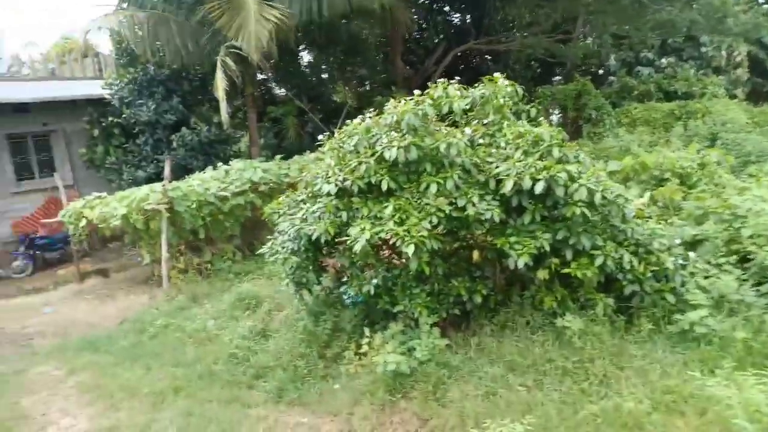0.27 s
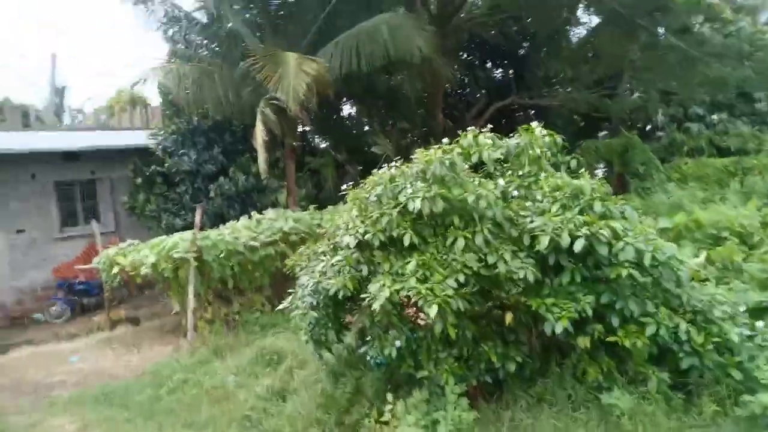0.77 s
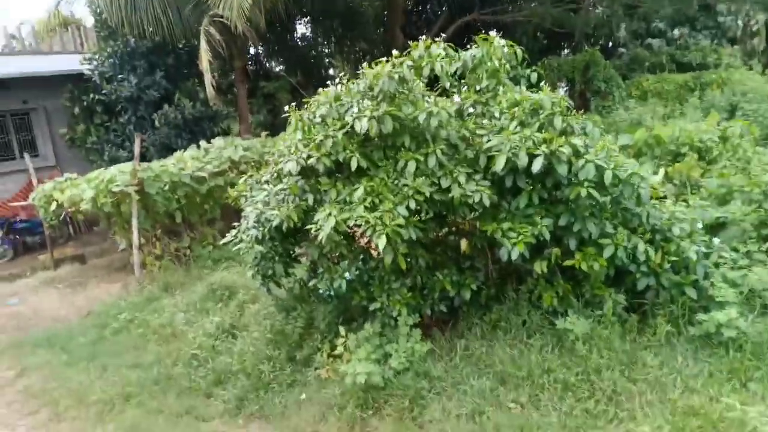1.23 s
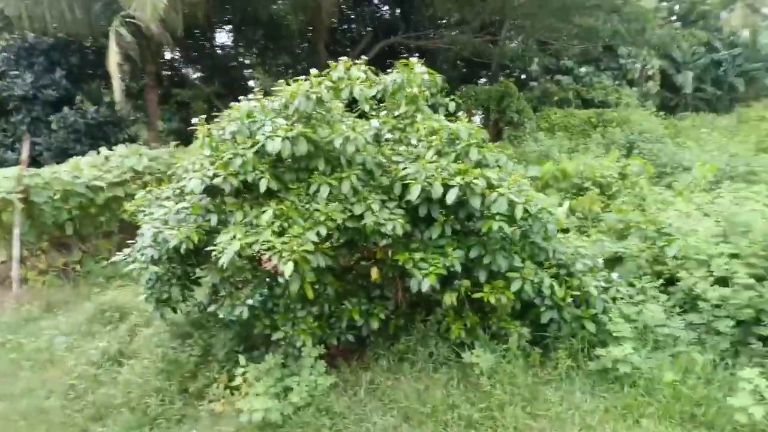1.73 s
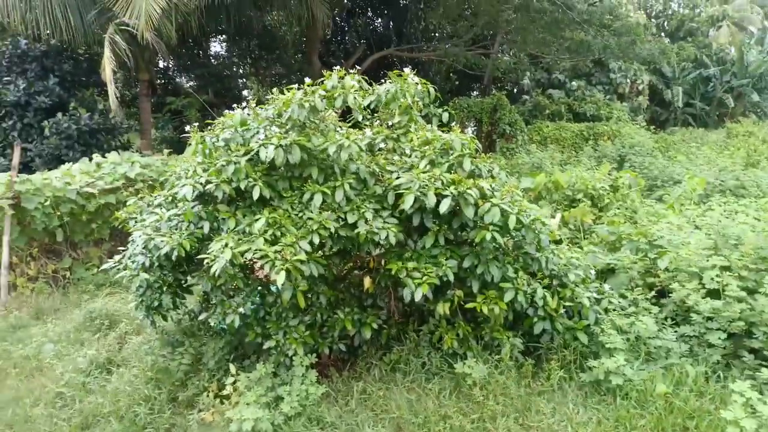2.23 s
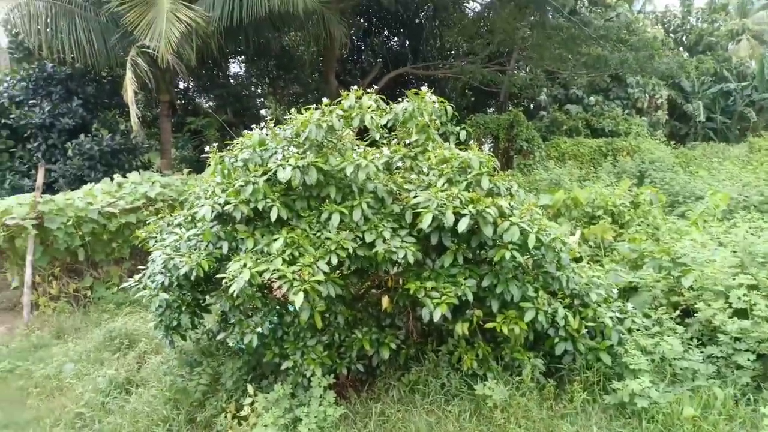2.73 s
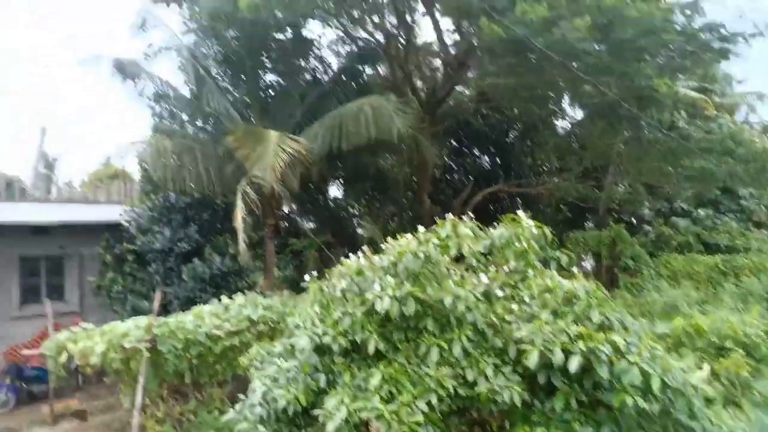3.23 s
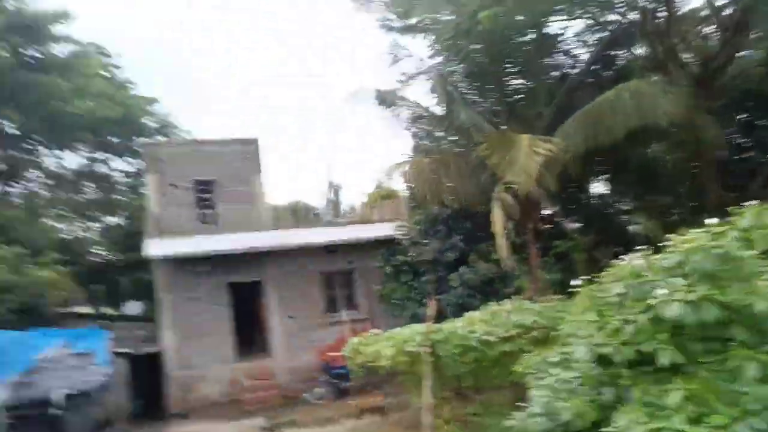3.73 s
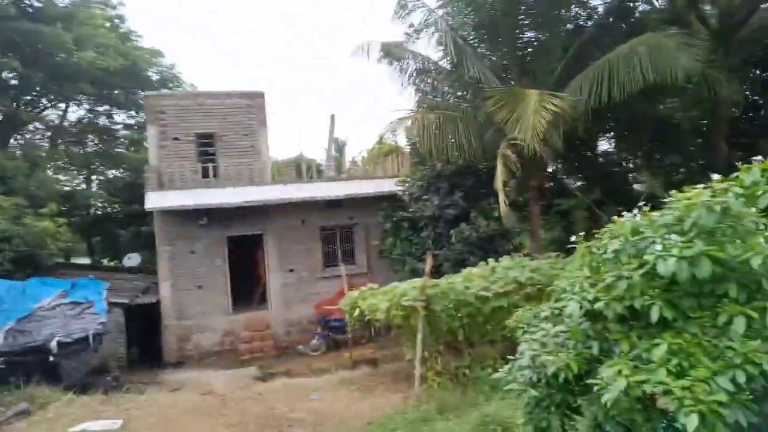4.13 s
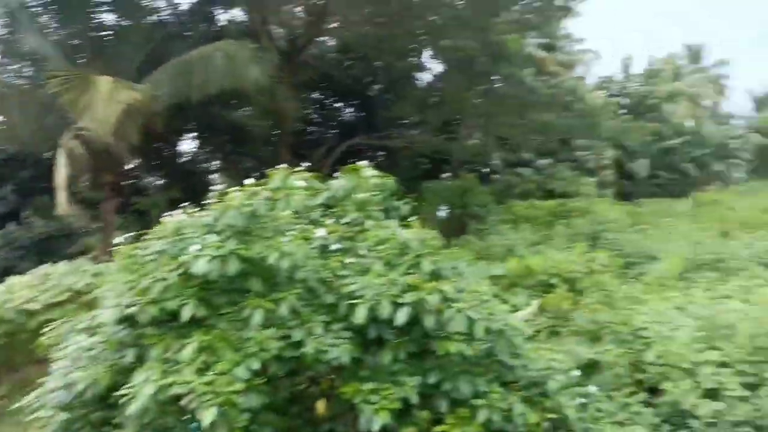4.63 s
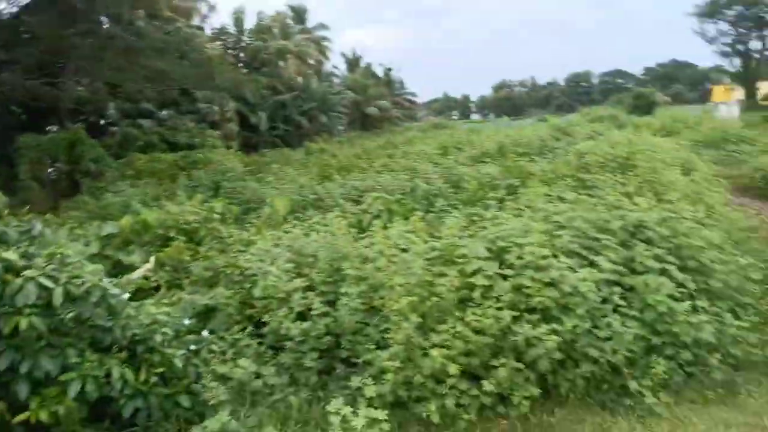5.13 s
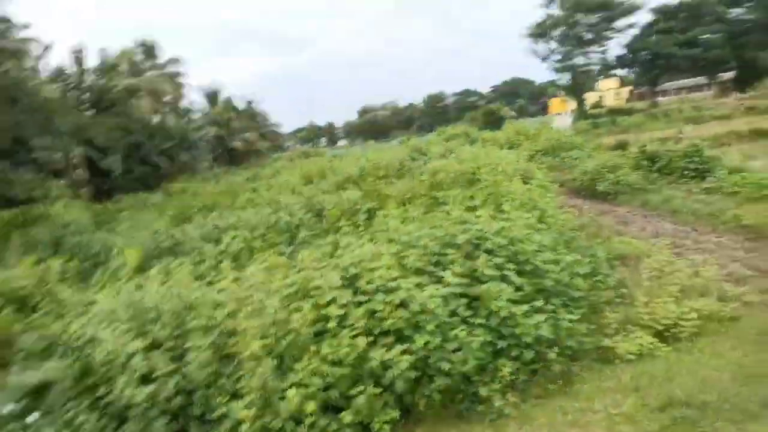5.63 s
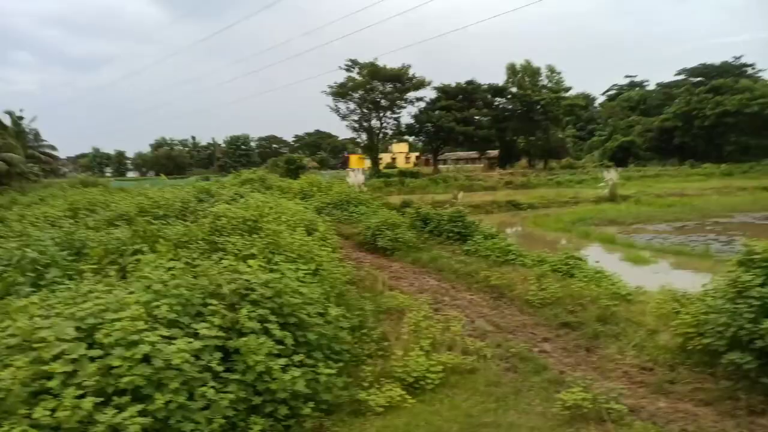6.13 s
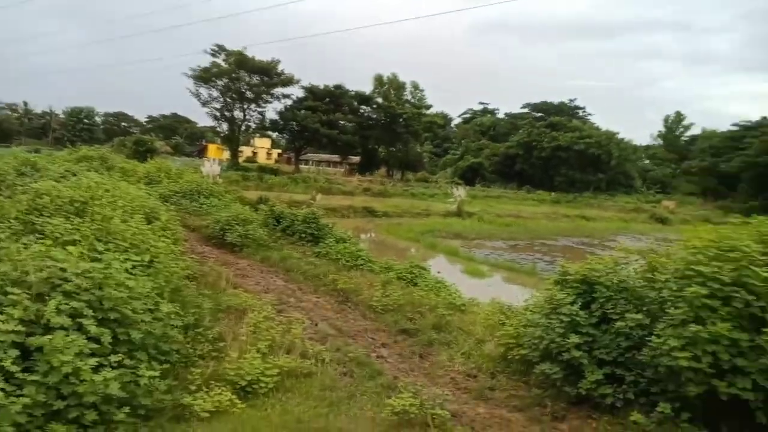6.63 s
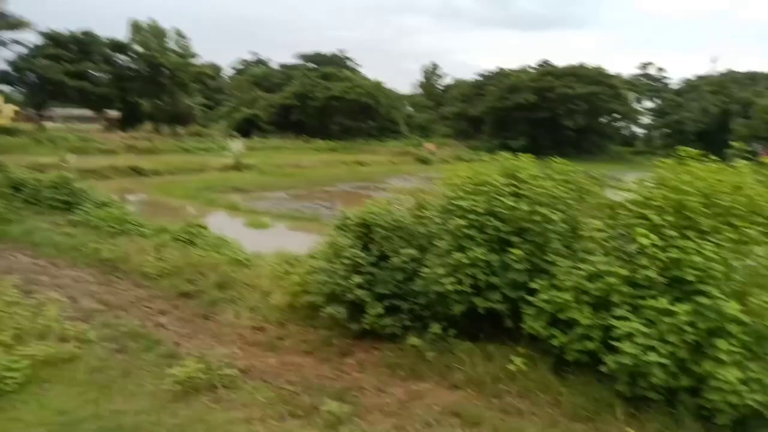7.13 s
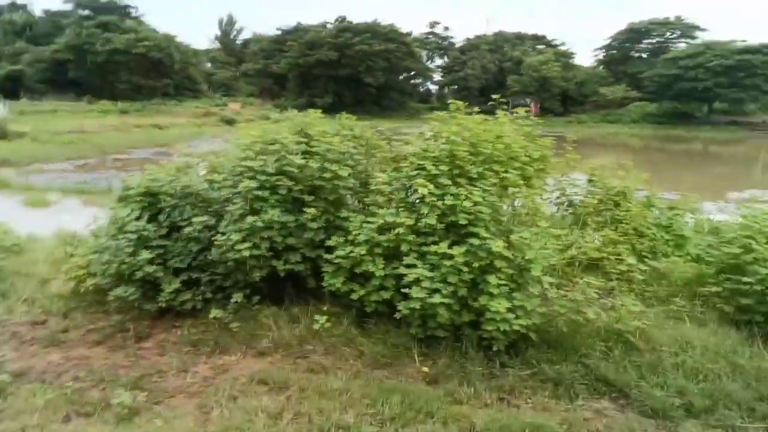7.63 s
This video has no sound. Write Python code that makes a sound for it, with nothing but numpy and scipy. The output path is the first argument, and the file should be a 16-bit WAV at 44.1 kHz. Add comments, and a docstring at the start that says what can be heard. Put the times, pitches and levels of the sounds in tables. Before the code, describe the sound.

One long, high cow call sinks and turns hoarse in a quiet farmyard, over chirping crickets, a small bird and soft microphone rubbing.

```python
"""A cow gives one long, high bellow across a farmyard. Its vocal folds ring on a tone that arches
and sinks, then they go slack and the voice breaks into a creak. Two bush crickets chirp with their
wings, first one on the left, later one on the right, over an insect chorus. A small bird twitters
and another animal calls far off. Fingers rub on the hand-held microphone, and light wind touches
its two openings (the ports)."""
import sys
import numpy as np
from scipy import signal
from scipy.fft import rfft, irfft, next_fast_len
from scipy.io import wavfile

SR = 44100
rng = np.random.default_rng(int(sys.argv[2]) if len(sys.argv) > 2 else 0)


def transcribe(signal):
    """Save signal, clipped to [-1, 1], as a 16-bit WAV file at the path in sys.argv[1]."""
    frames = np.atleast_2d(signal).T
    limited = np.clip(frames, -1, 1)
    pcm = np.round(limited * 32767).astype(np.int16)
    wavfile.write(sys.argv[1], SR, pcm)


N = 347949
TIME = np.arange(N) / SR


def from_db(db):
    """Turn decibels into a number to multiply by."""
    return 10 ** (np.asarray(db) / 20)


def unit_level(x):
    """Scale a sound so its average level (rms) is 1."""
    return x / np.sqrt(np.mean(x ** 2) + 1e-20)


def curves(rows):
    """Join a table's points over time: one curve for each column after the first."""
    times, *columns = np.transpose(rows)
    return [np.interp(TIME, times, column) for column in columns]


def during(rows):
    """1 from a table's first time to its last, with short fades outside."""
    start, stop = rows[0][0], rows[-1][0]
    return np.interp(TIME, [start - .02, start, stop, stop + .02], [0, 1, 1, 0])


def swell(peak_s, length_s):
    """A rounded rise and fall, 1 at the top."""
    return np.cos(np.pi * np.clip((TIME - peak_s) / length_s, -.5, .5))


def drift(rate_hz):
    """A smooth random wobble, about 1 in size."""
    r = np.exp(-40 * np.pi * rate_hz / SR)
    slow = signal.lfilter([1], [1, -2 * r, r * r], rng.standard_normal(N // 20 + 2002))[2000:]
    return np.interp(np.arange(N) / 20, np.arange(len(slow)), unit_level(slow))


def phase_of(hz):
    """The running angle of a vibration whose pitch changes."""
    return 2 * np.pi * np.cumsum(hz) / SR


def at_hz(points, hz):
    """Read between a table's frequencies, with octaves evenly spaced."""
    freqs, values = np.transpose(points)
    return np.interp(np.log(hz), np.log(freqs), values)


def noise(spectrum, likeness=((20, 0), (20000, 0))):
    """Stereo noise shaped by a spectrum; likeness 1 makes left and right the same, -1 opposite."""
    size = next_fast_len(N)
    hz = np.maximum(np.fft.rfftfreq(size, 1 / SR), 1)
    mid, side = rfft(rng.standard_normal((2, size)))
    alike = np.clip(at_hz(likeness, hz), -1, 1)
    edge_fade = 1 / (1 + (spectrum[0][0] / hz / 2) ** 2) / (1 + (hz / spectrum[-1][0] / 2) ** 2)
    both = np.sqrt(1 + alike) * mid + np.sqrt(1 - alike) * side * [[1], [-1]]
    return unit_level(irfft(both * edge_fade * from_db(at_hz(spectrum, hz)), size)[:, :N])


def panned(left_db):
    """Left and right gains that make the left side louder by left_db."""
    gains = from_db(np.array([[1], [-1]]) * left_db / 2)
    return gains / np.sqrt(np.mean(gains ** 2, axis=0))


def from_left(x, lag_ms):
    """The sound reaches the right port a little later."""
    return np.array([x, np.interp(TIME - lag_ms / 1000, TIME, x)])


def yard_echo(x, fade_s):
    """Walls and leaves scatter a spray of echoes that falls 60 dB in fade_s."""
    t = np.arange(SR) / SR
    spray = rng.standard_normal((2, SR)) * from_db(-60 * t / fade_s) * np.clip(t / .015, 0, 1)
    spray /= np.sqrt(np.sum(spray ** 2, axis=1, keepdims=True))
    return signal.fftconvolve(x[None], spray, axes=1)[:, :N]


# Tone colour of the swirling air and of the open-air hush: freq_hz, relative_db
EDDY_SPECTRUM = [(20, 2), (45, -0.5), (90, 2), (140, -8.5), (250, -25), (500, -42), (1000, -42)]
HUSH_SPECTRUM = [(18, -35), (30, -7), (59, -5), (252, -15.5), (311, -16), (341, -17), (431, -18),
                 (1180, -24), (1880, -28.5), (2490, -35), (3450, -40), (6190, -45), (8000, -48),
                 (10400, -84), (17600, -120)]
# How alike the hush is on both sides: freq_hz, likeness
HUSH_LIKENESS = [(30, 0.52), (100, 0.93), (250, 0.9), (500, 0.42), (1000, -0.39), (2000, 0.055),
                 (15000, -0.5)]
# Gusts: peak_s, length_s, eddy_db, left_db, hush_db
GUSTS = [(.3, 2.5, -63.5, -2.5, -56), (1.1, 1.9, -56, 0, -60.5), (2.272, 0.43, -51, -35, -69),
         (3.049, 0.65, -60.5, -13, -89), (3.606, 0.74, -71.5, -9, -67), (6.18, 0.75, -60.5, -6, -67),
         (6.752, 0.48, -61, -3, -68), (7.432, 0.53, -51, 3, -59)]
# Soft thumps of air on the right port: time_s, pitch_hz, peak_db
THUMPS = [(0.369, 84, -34.5), (1.785, 59, -36.5), (1.876, 66.4, -30), (2.282, 62.6, -46),
          (2.372, 47, -35.5), (6.252, 56.7, -42), (6.331, 45, -45.5)]
CALM_EDDY_DB, CALM_HUSH_DB = -68.5, -67

def breeze():
    """Air hushes and swirls at the ports, louder in each gust, with a few soft thumps."""
    eddy_power, hush_power = from_db(CALM_EDDY_DB) ** 2, from_db(CALM_HUSH_DB) ** 2
    for peak_s, length_s, eddy_db, left_db, hush_db in GUSTS:
        gust = swell(peak_s, length_s)
        eddy_power = eddy_power + (from_db(eddy_db) * gust * panned(left_db)) ** 2
        hush_power = hush_power + (from_db(hush_db) * gust) ** 2
    eddies = np.sqrt(eddy_power) * noise(EDDY_SPECTRUM, likeness=[(30, .23), (150, 1)])
    hush = np.sqrt(hush_power) * noise(HUSH_SPECTRUM, HUSH_LIKENESS)
    thumps = np.zeros(N)
    for time_s, hz, db in THUMPS:
        cycles = hz * (TIME - time_s)
        thumps += from_db(db) * np.cos(2 * np.pi * cycles) * np.exp(-np.minimum((1.54 * cycles) ** 2, 50))
    return eddies + hush + thumps * np.array([[from_db(-27)], [1]])


# Tone colour of sliding skin and of the ringing case: freq_hz, relative_db
SKIN_SPECTRUM = [(900, -14.5), (2000, 2.5), (3000, -1), (5000, -1), (6500, -7.5), (8000, -1), (9000, 4),
                 (10500, -8), (13000, -3), (15500, -20)]
CASE_SPECTRUM = [(400, -12), (800, -17.5), (1200, 1), (1550, -7.5), (2100, -19.5), (3000, -24),
                 (5000, -32.5)]
# Finger strokes: peak_s, rise_s, fall_s, hiss_db, ring_db
FINGER_STROKES = [(.55, 0.21, 0.15, -64, -52.5), (.74, 0.095, 0.14, -65, -57.5),
                  (1.165, .09, 0.099, -54.5, -50), (1.46, 0.31, 0.17, -69.5, -63),
                  (1.715, .13, 0.041, -57, -52), (1.901, .04, 0.054, -74, -78),
                  (3.05, 0.066, 0.31, -74.5, -72.5), (3.47, 0.12, 0.18, -71, -67),
                  (4.33, 0.26, 0.39, -80, -66.5), (4.402, .13, 0.04, -65, -63.5),
                  (5.11, 0.097, 0.37, -68.5, -64.5), (6.5, 0.22, 0.52, -81, -71),
                  (6.753, 0.12, 0.1, -60.5, -53.5), (7.351, 0.81, .5, -86, -78)]

def finger_rub():
    """Skin slides over the microphone's case, hissing and making it ring near 1200 Hz."""
    hiss_gain, ring_gain = np.zeros(N), np.zeros(N)
    for peak_s, rise_s, fall_s, hiss_db, ring_db in FINGER_STROKES:
        pressure = np.interp(TIME, [peak_s - rise_s, peak_s, peak_s + fall_s], [0, 1, 0])
        hiss_gain += from_db(hiss_db) * pressure
        ring_gain += from_db(ring_db) * pressure
    grip = from_db(1.9 * drift(96))   # the skin sticks and slips
    hiss = hiss_gain * noise(SKIN_SPECTRUM) * panned(-5.5)
    ring = ring_gain * noise(CASE_SPECTRUM, likeness=[(500, .79), (1300, .79), (3000, .037)])
    steady_hiss = from_db(-86) * noise(SKIN_SPECTRUM)
    return grip * (hiss + ring) + steady_hiss


# Small jolts to the case: time_s, strength_db
JOLTS = [(0.754, -43.5), (3.274, -67), (6.675, -41.5), (7.31, -67)]
# Notes the case rings on: pitch_hz, relative_db, fade_s
CASE_NOTES = [(1420, -1.5, 0.059), (2410, -8, 0.021), (8600, -4.5, 0.0042), (13000, -18.5, .002)]

def case_ticks():
    """Each jolt makes the case ring very briefly: a tick."""
    jolts, ticks = np.full(N, 1e-18), np.zeros(N)
    for time_s, db in JOLTS:
        jolts[round(time_s * SR)] = from_db(db)
    for hz, db, fade_s in CASE_NOTES:
        decay, step = from_db(-60 / (fade_s * SR)), 2 * np.pi * hz / SR
        feedback = [1, -2 * decay * np.cos(step), decay * decay]
        ticks += signal.lfilter([0, from_db(db) * np.sin(step)], feedback, jolts)
    return ticks


def glides(notes, overtones, waver):
    """Notes that swell and fade while the pitch bends through three points."""
    out, wobble = np.zeros(N), 1 + waver * drift(62)
    for start_s, length_s, first_hz, middle_hz, last_hz, db in notes:
        at = np.flatnonzero((TIME >= start_s) & (TIME < start_s + length_s))
        progress = np.linspace(0, 1, len(at))
        bend = np.polyfit([0, .5, 1], [first_hz, middle_hz, last_hz], 2)
        phase = phase_of(np.polyval(bend, progress) * wobble[at])
        wave = np.sin(phase) + sum(from_db(level) * np.sin(k * phase) for k, level in overtones)
        out[at] += from_db(db) * np.sqrt(2 * np.abs(np.sin(np.pi * progress))) * wave
    return out


# Distant calls: start_s, length_s, start_hz, fall_share, relative_db
FAR_CALLS = [(2.1, 0.34, 2240, 0.12, -78), (2.25, 0.33, 1035, 0.25, -75.5), (3.4, 0.5, 1017, 0.28, -67),
             (4.5, .5, 858.4, 0.0191, -77), (5.4, 0.05, 959, 0.11, -67), (5.489, 0.053, 956, 0.094, -71),
             (7.22, 0.2, 183.3, 0.013, -58), (7.3, .1, 903, 0.039, -60)]
EARLY_FALL = .45   # share of the fall done halfway through a call

def far_animal():
    """Hoarse, falling calls from far away, with as much echo as direct sound."""
    notes = [(start_s, length_s, hz, hz * (1 - EARLY_FALL * fall), hz * (1 - fall), db)
             for start_s, length_s, hz, fall, db in FAR_CALLS]
    calls = glides(notes, overtones=[(1.5, -12), (2.5, -14)], waver=.018)
    return from_db(-4.5) * (from_left(calls, lag_ms=.067) + yard_echo(calls, fade_s=.49))


# Upward flicks: start_s, start_hz, relative_db
UP_FLICKS = [(1.92, 5100, -74), (2.495, 5160, -76), (2.83, 3220, -70), (4.14, 4740, -74), (4.69, 4780, -77),
             (5.248, 4670, -61.5), (5.599, 4700, -66), (5.948, 3760, -70), (6.592, 4700, -72.5)]
UP_TOP_HZ, UP_S, EARLY_RISE = 5950, .019, .57   # EARLY_RISE: share of the rise done halfway
# Downward flicks: start_s, length_s, start_hz, end_hz, relative_db
DOWN_FLICKS = [(2.035, 0.039, 5000, 3570, -78), (2.538, 0.1, 5000, 3450, -74),
               (2.611, 0.031, 4300, 3480, -62), (2.966, .08, 5750, 5050, -81),
               (4.797, 0.055, 5000, 3180, -76), (5.365, .045, 4400, 2500, -69),
               (5.718, 0.043, 4410, 2570, -66), (6.058, .05, 4900, 2920, -62.5)]
# Short arching notes: start_s, top_hz, relative_db
PIPS = [(2.69, 2200, -72.5), (4.86, 2230, -71), (5.42, 2250, -76), (5.488, 1670, -67), (5.53, 2290, -69.5),
        (5.971, 3080, -81), (6.98, 3040, -75.5), (7.046, 3060, -75)]
PIP_S, PIP_SAG = .036, .077   # both ends sag below the top by this share

def bird():
    """A small bird on the right whistles quick glides, a little smeared by leaves."""
    notes = [(s, UP_S, hz, hz + EARLY_RISE * (UP_TOP_HZ - hz), UP_TOP_HZ, db) for s, hz, db in UP_FLICKS]
    notes += [(s, length, high, np.sqrt(high * low), low, db) for s, length, high, low, db in DOWN_FLICKS]
    notes += [(s, PIP_S, hz * (1 - PIP_SAG), hz, hz * (1 - PIP_SAG), db) for s, hz, db in PIPS]
    song = glides(notes, overtones=[], waver=.02) * from_db(3.5 * drift(140))
    return (from_db(-7.5) * song + from_db(-12) * yard_echo(song, fade_s=.1)) * panned(-8.5)


# Loudness of the far insects: time_s, level_db
CHORUS_LEVEL = [(0, -67), (1.5, -68), (2.6, -80), (4.1, -79.5), (5.3, -74.5), (6.3, -71.5), (7, -74),
                (7.89, -69.5)]

def insect_chorus():
    """Many far insects blur into one high band of noise, mostly on the left."""
    band = noise([(7500, -42), (8800, -7.5), (9500, 0), (9950, -1.5), (10400, -6),
                  (11200, -19), (13000, -34.5), (16000, -46)])
    return from_db(curves(CHORUS_LEVEL)[0] + .87 * drift(60)) * band * panned(12)


# Runs of chirps: start_s, stop_s, chirp_every_s, pitch_hz
CHIRP_RUNS = [(-.033, 2.66, .1075, 9350), (3.925, 6.91, .1029, 9130), (6.98, 7.89, .102, 9100)]
# Loudness and side of the chirping: time_s, level_db, left_db
CHIRP_LEVEL = [(0, -62.5, 13), (1.3, -48.5, 26), (1.85, -58, 30), (2.66, -58, 20.5), (3.92, -75, 18),
               (4.5, -65, 28), (5.8, -68, 8), (6.5, -67, -6), (7.1, -72, -10), (7.5, -58, -14),
               (7.89, -84, -12)]
WING_STROKES_PER_S, STROKE_FALL_HZ = 135, 700

def crickets():
    """Each wing stroke is a short falling whistle; the strokes swell into chirps."""
    db, left_db = curves(CHIRP_LEVEL)
    chirps, hz = np.zeros(N), np.zeros(N)
    for start_s, stop_s, every_s, pitch_hz in CHIRP_RUNS:
        singing = (TIME > start_s) & (TIME < stop_s)
        progress = (TIME - start_s) / every_s % 1
        chirps += np.interp(progress, [.2, .45, .8, .95, 1], [.072, .47, .72, .84, .08]) * singing
        hz += pitch_hz * singing
    stroke = np.cumsum(WING_STROKES_PER_S * (1 + .022 * drift(5))) / SR % 1   # 0 to 1 in each stroke
    whistle = np.sin(phase_of(hz + STROKE_FALL_HZ * (.5 - stroke) + 50 * drift(7.5) + 80 * drift(400)))
    pulses = unit_level(np.sin(np.pi * stroke) ** 2 * whistle)
    return from_db(db + 2.5 * drift(6.4)) * pulses * chirps * panned(left_db)


# Low groans inside the bellow: peak_s, length_s, pitch_hz, level_db
GROANS = [(0.103, .18, 280.3, -46), (0.605, 0.69, 322, -52.5), (1.146, 0.34, 317.4, -41)]

def groans(phase):
    """A second, lower vibration mixes with the main one, adding tones at the sums of their pitches."""
    out, waver = 0, 1 + .0048 * drift(60)
    for peak_s, length_s, hz, db in GROANS:
        low = phase_of(hz * waver)
        wave = np.sin(low) + from_db(-11) * np.sin(low + phase) + from_db(-7.5) * np.sin(low + 2 * phase)
        out = out + from_db(db) * swell(peak_s, length_s) ** 2 * wave
    return np.sqrt(2) * out * from_db(1.92 * drift(50))


CREAK_START_S, CREAK_RISE_S, CREAK_FADE_DB_PER_S = 1.375, .045, 162
CREAK_HZ, CREAK_OCTAVES_PER_S, CREAK_DB = 500, 5.6, -44.5

def creak(phase):
    """The vocal folds go slack and flap unevenly, ever lower; each flap lets a puff through the mouth."""
    age_s = np.clip(TIME - CREAK_START_S, 0, 1)
    flap = phase_of(CREAK_HZ * 2 ** (-CREAK_OCTAVES_PER_S * age_s) * (1 + .2 * drift(60)))
    fade_db = CREAK_FADE_DB_PER_S * np.maximum(age_s - CREAK_RISE_S, 0)
    gain = np.minimum(age_s / CREAK_RISE_S, 1) * from_db(CREAK_DB - fade_db + 2.2 * drift(50))
    mouth = noise([(500, 13.5), (850, -12), (1200, 4), (1420, 2), (1800, -18.5), (2600, -31)])[0]
    puffs = from_db(-5.5) * mouth * (1 + np.cos(flap))
    folds = np.sin(flap) + from_db(-8) * np.sin(2 * flap) + np.sin(flap + phase * 4 / 3)
    return np.sqrt(2) * gain * (folds + puffs)


# Extra tones from the folds' uneven vibration: times_the_pitch, relative_db
SIDE_TONES = [(5 / 3, -6), (7 / 4, -2), (7 / 3, -3), (8 / 3, -7), (11 / 4, -6), (10 / 3, -12),
              (11 / 3, -16), (13 / 3, -26), (14 / 3, -30), (16 / 3, -33)]
# Tone colour of air in the throat: freq_hz, relative_db
THROAT_SPECTRUM = [(200, -18.5), (400, 4.5), (520, -32), (700, -1), (950, -23), (1200, 3), (1500, 5.5),
                   (1800, 3.5), (2100, -12.5), (2450, -13), (3000, -28), (4200, -33.5)]
BUZZ_DB, HOARSE_BUZZ_LOSS_DB, RASP_DB = -51.5, 24.5, -46.5

def throat(phase, rough):
    """Uneven vibration adds a buzz and side tones; rasping air takes over as the voice gets hoarse."""
    buzz_gain = np.sqrt(2) * from_db(BUZZ_DB - HOARSE_BUZZ_LOSS_DB * rough + 7 * drift(32))
    # every third cycle is stronger, which puts a tone between the pitch and its octave
    buzz = buzz_gain * np.sin(phase * 4 / 3 + phase_of(40 * rough * drift(27)))
    sides, wander_hz = np.zeros(N), 9 + 42 * rough
    for multiple, db in SIDE_TONES:
        gain = from_db(db + 3.5 * drift(12))
        sides += gain * np.sin(multiple * phase + phase_of(wander_hz * drift(40)))
    air = unit_level(noise(THROAT_SPECTRUM)[0] * (1 + np.cos(phase / 3)))
    rasp = np.sqrt(1 - rough) * unit_level(sides) + np.sqrt(rough) * air
    return buzz + from_db(RASP_DB) * rasp


# The bellow's tune: time_s, pitch_hz
BELLOW_PITCH = [(.02, 537), (.12, 616.2), (.33, 652.4), (.6, 650.5), (.78, 642.3), (.89, 633.2),
                (1.14, 607.8), (1.29, 573), (1.43, 616.5)]
# Strength of the main tone: time_s, level_db
TONE_LEVEL = [(0.021, -74), (.045, -48.5), (.11, -41), (0.201, -31), (0.309, -39), (.56, -36.5),
              (.73, -26.5), (.82, -27), (0.891, -36.5), (.95, -25), (1.041, -36), (1.13, -26), (1.22, -34),
              (1.39, -34.5), (1.43, -39), (1.47, -55), (1.54, -65)]
# Where the main tone is heard: time_s, left_db, right_lag_ms
TONE_PLACE = [(.22, 2.5, 0.42), (.29, -2.5, 0.54), (.35, 16, 0.77), (.46, 11, 1), (.59, -8, 0.42),
              (.8, 10, 0.35), (.95, 0.5, .52), (1.4, 2, 0.39)]
# The overtone one octave up: time_s, level_db, left_db
OCTAVE_LEVEL = [(.18, -56.5, -3), (.33, -44.5, -0.5), (.52, -36.5, -0.5), (.68, -36, 0.5), (.82, -33, 10),
                (.92, -43.5, 6), (1.32, -45, -6), (1.405, -34, 2.5), (1.47, -59, 0)]
# How hoarse the voice is: time_s, roughness_0_to_1
HOARSENESS = [(.08, .75), (.18, .12), (.45, .13), (.53, .3), (.68, .22), (.8, .13), (.98, .14), (1.15, .22),
              (1.3, .33), (1.42, .9)]
# The open mouth lets out the buzz and rasp: time_s, gain_db
MOUTH_OPENING = [(.02, -25.5), (.13, -7), (.21, -5), (.33, -3), (.55, 1), (1.25, 1.5), (1.42, -4.5),
                 (1.49, -44)]
STUTTER_START_S, STUTTER_PEAK_S, STUTTER_EVERY_S, STUTTER_DEPTH = 1.28, 1.384, .042, .8

def cow():
    """The vocal folds ring on one high tone, which stutters ever more deeply and breaks into a creak."""
    [hz], [tone_db], [rough] = curves(BELLOW_PITCH), curves(TONE_LEVEL), curves(HOARSENESS)
    phase = phase_of(hz * (1 + .02 * rough * drift(70)))
    depth = np.interp(TIME, [STUTTER_START_S, STUTTER_PEAK_S], [0, STUTTER_DEPTH])
    stutter = 1 + depth * np.cos(2 * np.pi * (TIME - STUTTER_PEAK_S) / STUTTER_EVERY_S)
    tone_gain = from_db(tone_db + 5 * rough * drift(30)) * during(TONE_LEVEL)
    tone = np.sqrt(2) * stutter * tone_gain * np.sin(phase)

    octave_db, octave_left_db = curves(OCTAVE_LEVEL)
    upper = np.sin(2 * phase) + from_db(-15.5) * np.sin(3 * phase) + from_db(-42.5) * np.sin(4 * phase)
    overtones = np.sqrt(2) * from_db(octave_db + 2 * drift(33)) * upper * during(OCTAVE_LEVEL)
    mouth_gain = from_db(curves(MOUTH_OPENING)[0]) * during(TONE_LEVEL)
    growl = throat(phase, rough) * mouth_gain + groans(phase) + creak(phase)

    left_db, lag_ms = curves(TONE_PLACE)
    direct = from_left(tone, lag_ms) * panned(left_db) + from_left(growl, lag_ms=.388)
    direct += from_left(overtones, lag_ms=.35) * panned(octave_left_db)
    echo = yard_echo(growl + from_db(-9) * overtones + from_db(-19) * tone, fade_s=.24)
    return direct + from_db(-4) * echo


def scene():
    """Everything heard from the edge of the yard."""
    return cow() + crickets() + insect_chorus() + bird() + far_animal() + finger_rub() + case_ticks() + breeze()


CUTOFF_HZ = 15450

def record(dry):
    """A steep filter removes the very highest treble."""
    return signal.sosfilt(signal.ellip(12, .1, 90, CUTOFF_HZ, fs=SR, output="sos"), dry)


dry = scene()
out = record(dry)
transcribe(out)
```